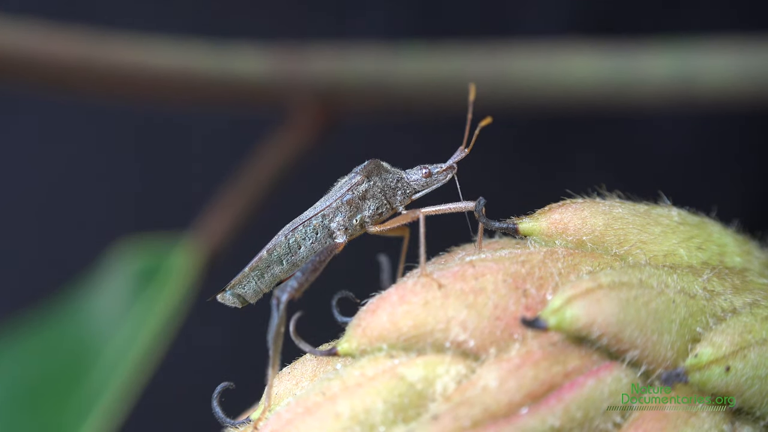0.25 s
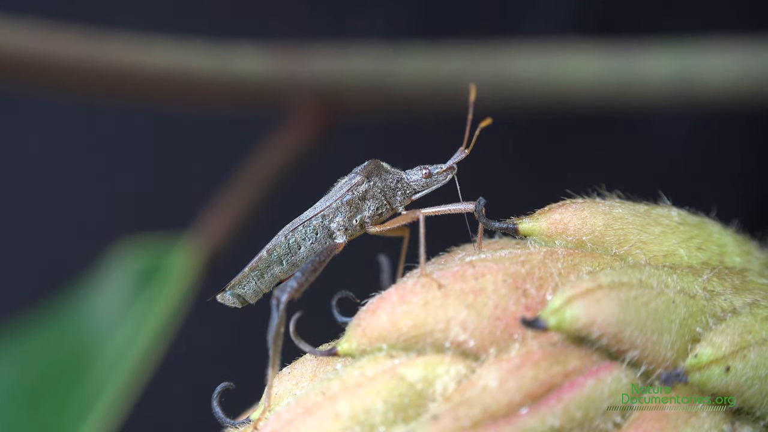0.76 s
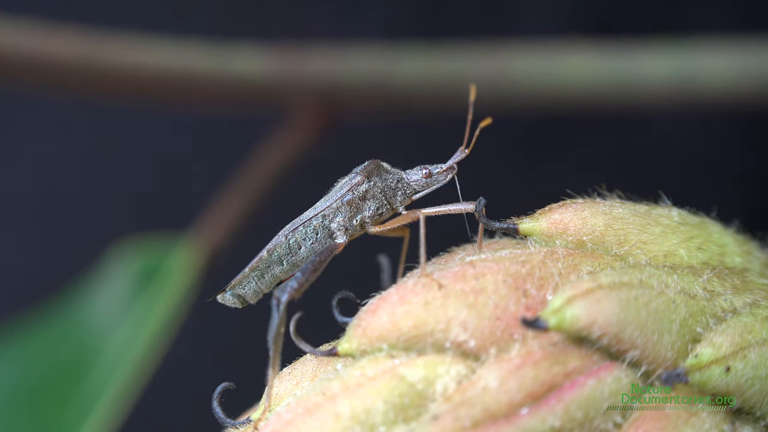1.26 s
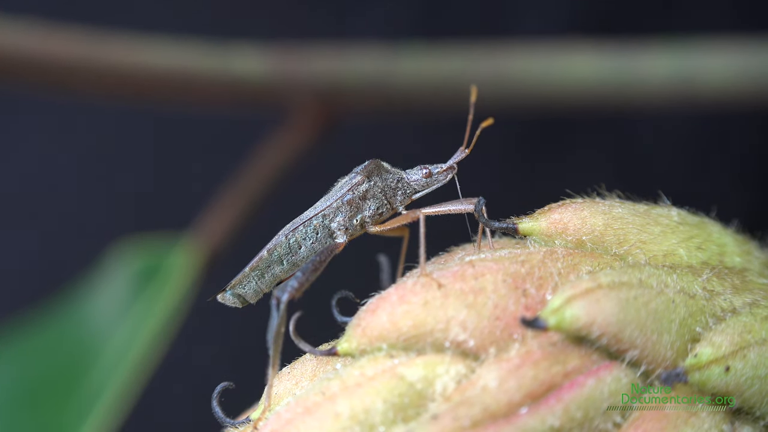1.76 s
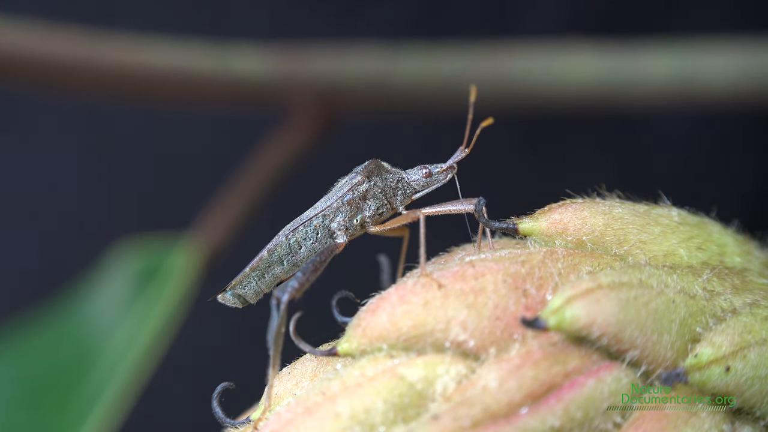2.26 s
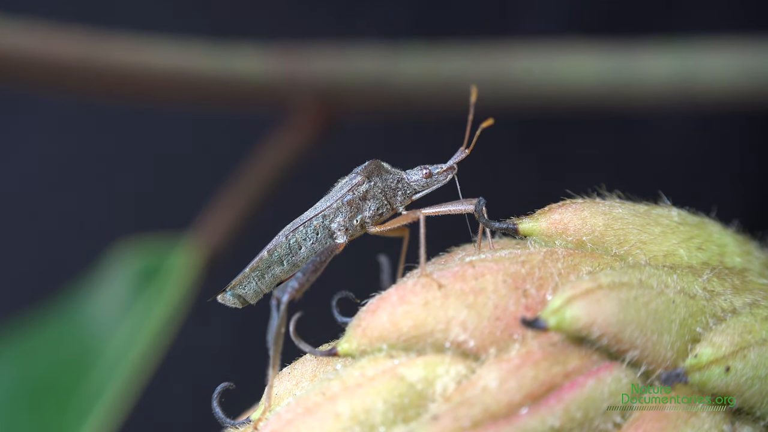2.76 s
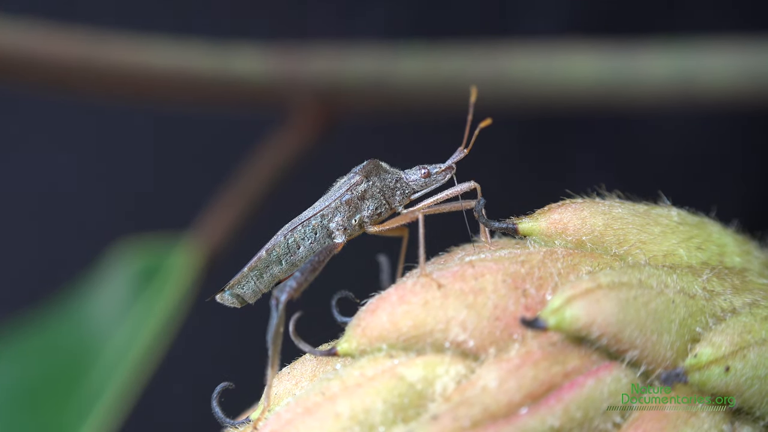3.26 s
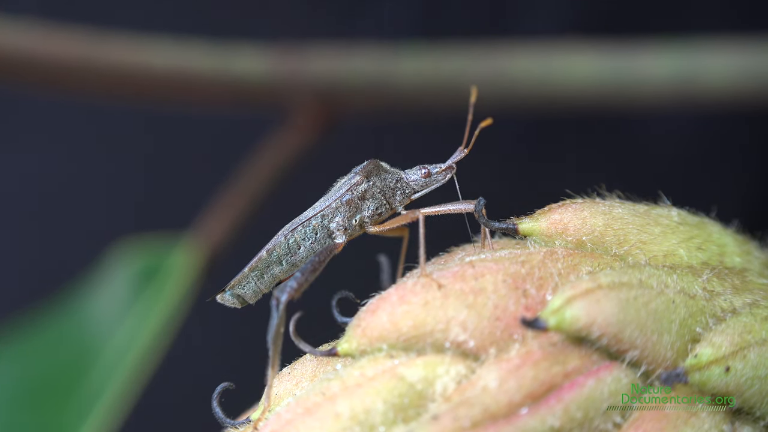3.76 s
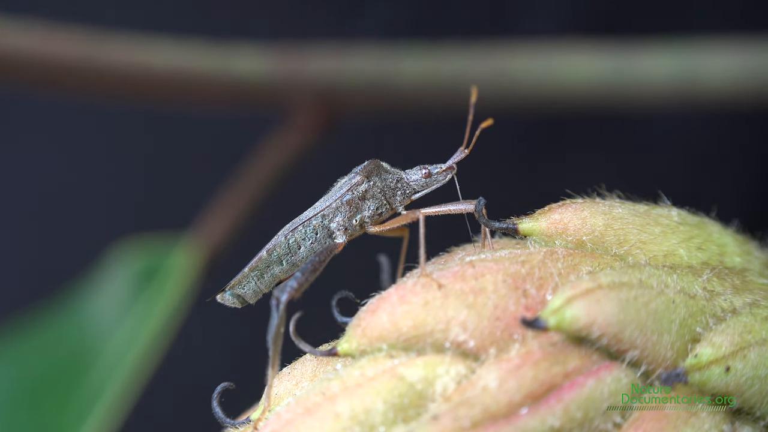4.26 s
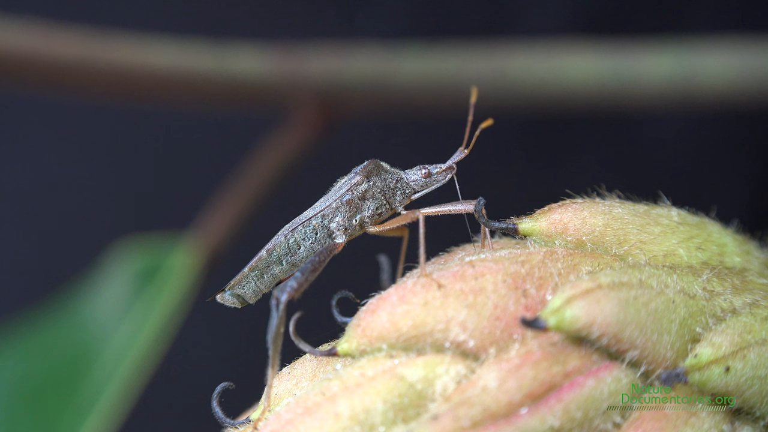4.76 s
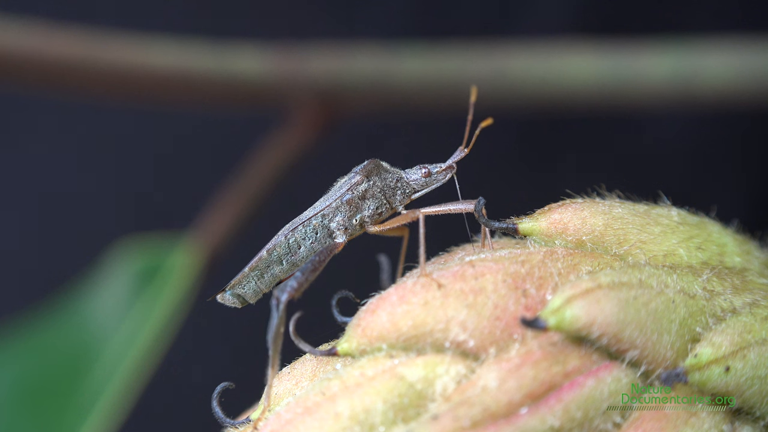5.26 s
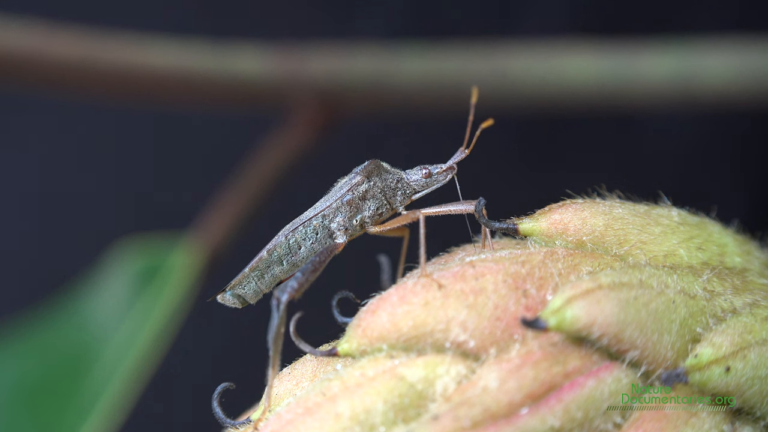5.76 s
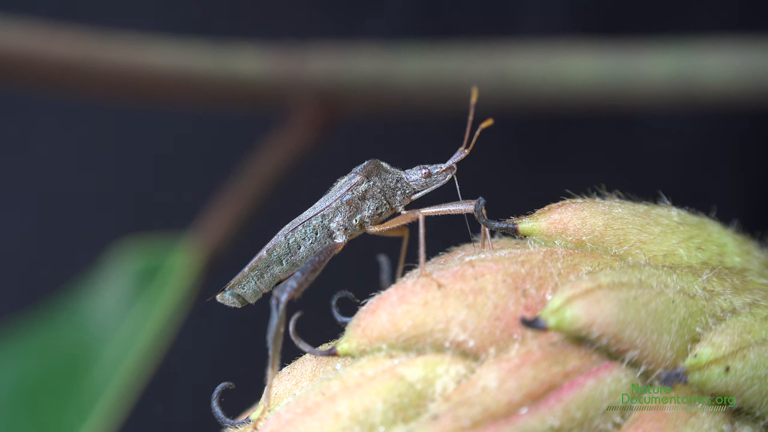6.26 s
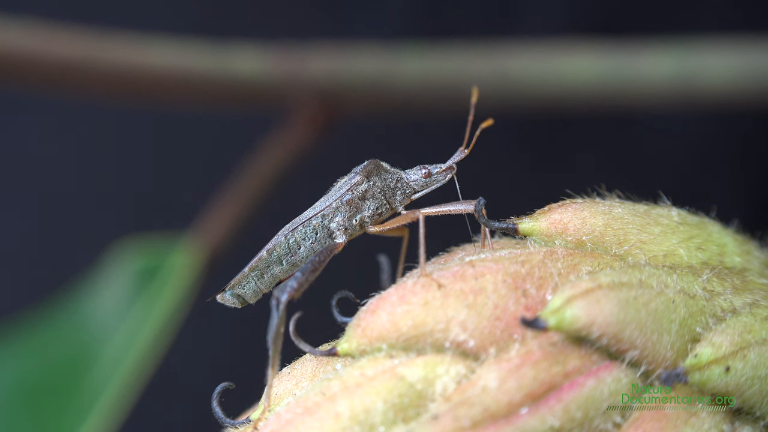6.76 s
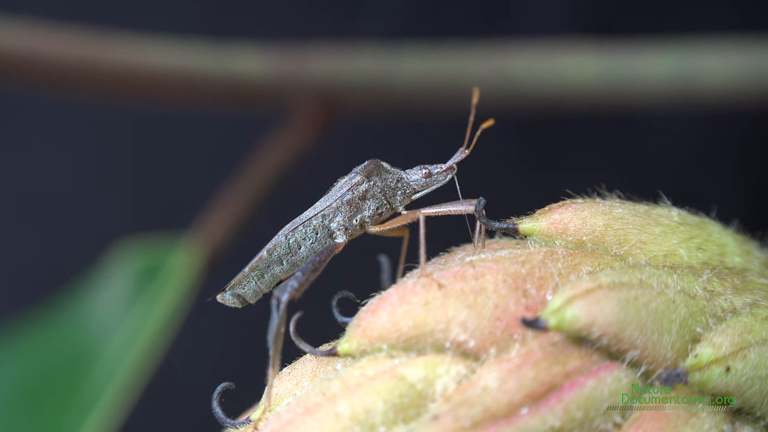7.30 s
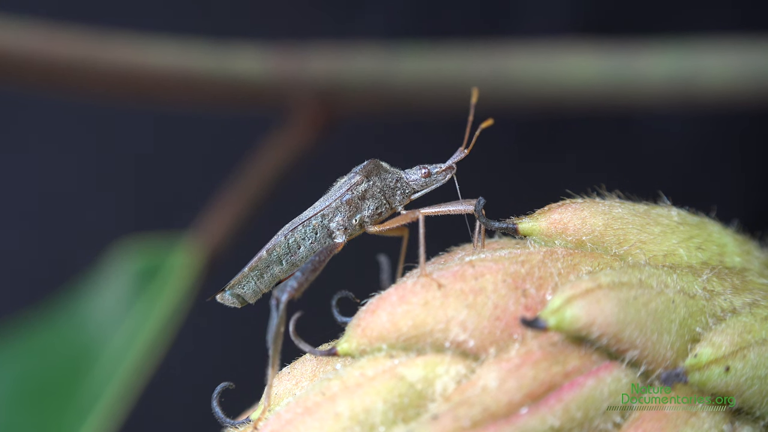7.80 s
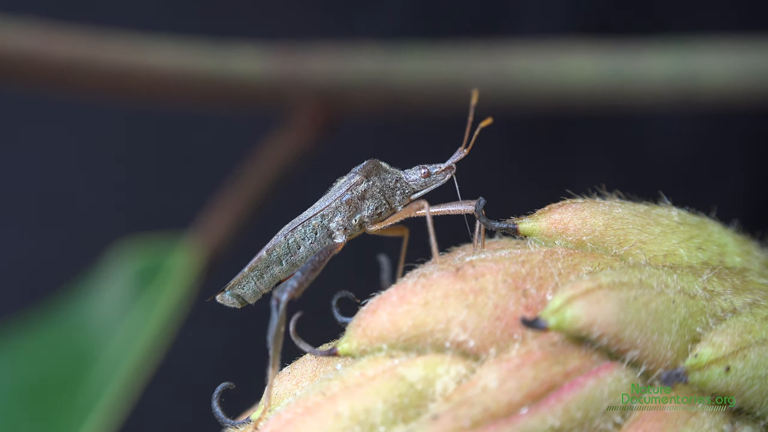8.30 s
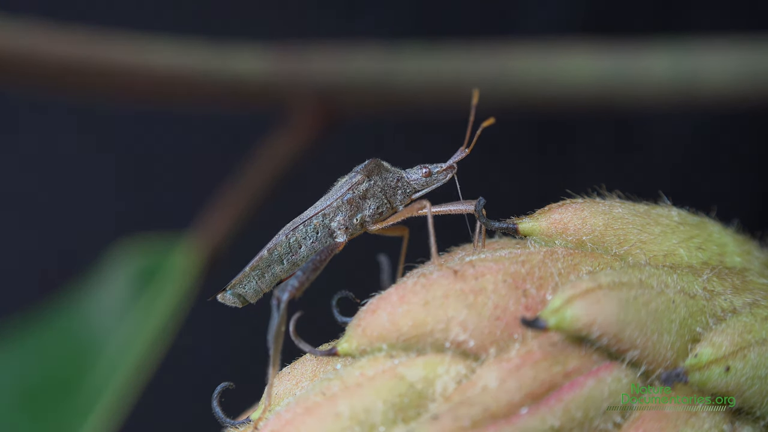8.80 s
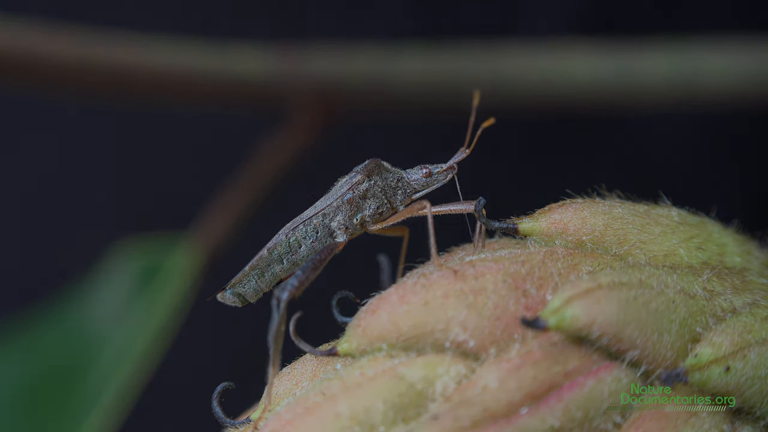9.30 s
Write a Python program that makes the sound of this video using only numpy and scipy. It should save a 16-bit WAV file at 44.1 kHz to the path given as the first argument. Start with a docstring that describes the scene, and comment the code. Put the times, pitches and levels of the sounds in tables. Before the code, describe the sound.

A quiet outdoor night filled with crickets, heard in stereo. From 0 seconds a close cricket, slightly right, sings short high trills near 6.8 kHz: rapid ringing pulses, about seventy a second, swell for roughly 0.4 seconds, slow a touch and stop dead. They repeat about every 0.7 seconds, with a longer gap around 3.5 to 4 seconds. Two distant crickets trill at their own pace, one regular and slightly higher, one looser and lower, both blurred by echoes over an unbroken shimmering chorus. A far vehicle is nearest around 0.2 seconds, then recedes into soft road roar; a very faint whine drops in pitch near 1.1 seconds. Low engine hum and boom waver below. A crisp dry tick comes at 0.8, fainter ones at 1.3, 2.7 and 7.3, with barely audible scuffs between 2 and 3.3 and near 8.2. Everything fades from about 8.5 until the end near 9.5.

```python
"""Crickets at night

One near cricket swells into short trills; two farther ones keep their own time over a distant chorus.
Each song repeats one wing stroke, a short ringing tone that falls in pitch; echoes blur the far singers.
Far traffic, as coloured noise, passes over a low engine drone built of wavering sines.
Small ticks (decaying modes) and scuffs (banded noise) sound close by. All fades in the last second."""
import sys
import numpy as np
from scipy import signal
from scipy.fft import rfft, irfft, next_fast_len
from scipy.io import wavfile

SR = 44100
rng = np.random.default_rng(int(sys.argv[2]) if len(sys.argv) > 2 else 0)


def wav_record(signal):
    """Record a signal, one row per channel, as 16-bit PCM in the file named by sys.argv[1]."""
    frames = np.transpose(np.atleast_2d(signal))
    bounded = np.clip(frames, -1, 1)
    # unit amplitude maps onto the largest positive 16-bit level
    quanta = np.round(bounded * 32767).astype(np.int16)
    wavfile.write(sys.argv[1], SR, quanta)


N = 420707

# All levels are relative: later gains and stereo offsets also apply.
# Deep night air, spectrum: [f/Hz, level/dB]
AIR_SPECTRUM = [(15, -25), (35, -6.5), (60, 1.5), (90, 1.5), (200, -13.5), (500, -80)]
# Tyre roar, spectrum: [f/Hz, level/dB]
ROAR_SPECTRUM = [(180, -10.5), (300, 0), (431, -4), (549, -2), (643, -2.5), (761, 0.5), (981, -0.5),
                 (1410, -5), (2990, -13.5), (4670, -17.5), (5400, -17), (7020, -40), (11900, -120)]
# Traffic rumble, spectrum: [f/Hz, level/dB]
RUMBLE_SPECTRUM = [(15, -2.5), (35, -5), (60, -0.5), (100, -3), (160, 1.5), (230, -0.5), (320, -16.5),
                   (450, -12), (900, -41.5)]
# Thin steady hiss, spectrum: [f/Hz, level/dB]
HISS_SPECTRUM = [(2000, -31), (5000, -36), (8200, 7.5), (9500, 8.5), (12000, 7.5)]
# Stereo sides of the noise against its middle: [f/Hz, level/dB]
SIDE_LEVELS = [(30, -14), (70, -25), (150, -18), (300, -11.5), (600, -13.5), (1100, -19.5), (1500, -34),
               (2400, -65), (4000, -65), (6000, -14)]
# Dull bumps in the rumble: [t/s, level change/dB]
RUMBLE_BUMPS = [(.35, -0.5), (1.92, 6.5), (2.03, 1.5), (2.36, 4.5), (2.82, 0.5), (3.13, 0.5), (3.80, 6),
                (4.17, 2), (5.34, 5)]
# Swells of the low boom: [t/s, level rise/dB]
BOOM_RISES = [(.25, 4), (1.05, 7.5), (1.7, 3), (2.3, 3.5), (4.75, 6.5), (5.55, 7), (6.65, 7), (8.38, 8),
              (9.05, 10.5)]
# Fundamental of the engine hum: [t/s, f/Hz]
HUM_PITCH_CURVE = [(0, 130.4), (1.1, 130.7), (2.9, 129.1), (6.5, 128.3), (8.5, 126.8)]
# Engine hum, fundamental: [t/s, level/dB]
HUM_LEVEL = [(0, -67), (.8, -72), (2.1, -66), (2.8, -58), (3.6, -59), (4.05, -68), (4.7, -61.5), (5.4, -59),
             (6.25, -69), (7.0, -56.5), (8.0, -60), (8.5, -69)]
# Engine hum, octave: [t/s, level/dB]
OCTAVE_LEVEL = [(0, -60), (1.0, -57.5), (1.3, -66), (1.7, -63), (2.4, -66), (4.2, -68.5), (4.8, -68),
                (6.9, -67.5), (8.0, -87)]
# Engine hum, third harmonic: [t/s, level/dB]
THIRD_LEVEL = [(5.2, -82), (5.8, -75), (8.5, -77)]
# Far chorus, spectrum: [f/Hz, level/dB]
CHORUS_SPECTRUM = [(5150, -36), (5350, -28), (5550, -23.5), (5750, -18), (5870, -15.5), (6100, -9),
                   (6280, -4), (6450, -1.5), (6680, 0), (6790, 1.5), (7000, -4.5), (7200, -9.5),
                   (7400, -16), (7520, -16.5), (7630, -24), (7850, -23), (8000, -34)]
# Brief dips of the chorus: [t/s, depth/dB]
CHORUS_DIPS = [(.42, 0), (1.56, 3.5), (3.88, 2), (4.53, 1.5), (5.5, 4.5), (8.76, 1)]
# Far crickets that sing unbroken: [f/Hz, level/dB, pitch waver/Hz, phase lead of the left channel/rad]
UNBROKEN_TONES = [(5740, -73, 20, 0.45), (6044, -75, 13, .4), (6380, -58.5, 28.4, 0.27),
                  (6750, -53.5, 8.6, 0.99)]
# Lower far cricket, one row a trill: [t of the last wing stroke/s, level/dB, length/s]
LOW_CRICKET_TRILLS = [(.31, -40, .22), (1.10, -46.5, 0.35), (1.75, -50, .25), (2.35, -45, 0.32),
                      (3.08, -45, 0.19), (3.72, -45.5, 0.27), (4.30, -49, 0.53), (4.92, -41, 0.36),
                      (5.42, -38.5, 0.21), (6.06, -41.5, 0.28), (6.80, -46, 0.28), (7.41, -44, .25),
                      (8.03, -52, 0.4), (8.66, -42, .25), (9.28, -52, .25)]
# Near cricket, one row a trill: [t of the last wing stroke/s, level/dB, length before the drag/s]
NEAR_TRILLS = [(0.0776, -35.5, 0.49), (0.7518, -35.5, 0.39), (1.4456, -36.5, 0.39), (2.134, -36.5, .45),
               (2.7886, -35.5, 0.34), (3.4873, -36.5, .37), (4.423, -34.5, .42), (5.1403, -34.5, 0.4),
               (5.7888, -35, .37), (6.4568, -35, .45), (7.143, -37, 0.55), (7.7594, -34, 0.36),
               (8.424, -36.5, .48), (9.0578, -36.5, 0.35), (9.6526, -37.5, 0.39)]
# Small ticks: [t/s, level/dB, pitch factor on the modes, brightness/(dB per octave)]
TICK_EVENTS = [(0.8014, -33, 0.91, -1), (.8040, -19, 0.86, 3.5), (0.8054, -42, 1, -3),
               (0.8084, -36, .88, -2), (1.2762, -35, 0.89, -4), (2.6772, -38, 0.73, -4),
               (7.3252, -40, 1.6, -1), (7.3262, -42, 1.14, -2)]
# Modes of a tick before its pitch factor: [f/Hz, level/dB, 60 dB decay time/s]
TICK_RESONANCES = [(1990, -3, 0.0035), (2560, -5.5, 0.0045), (2995, -0.5, 0.004), (3570, -9, 0.0017),
                   (5140, -4, 0.0017), (8700, -12, 0.0018)]
# Soft scuffs: [t/s, length/s, level/dB, centre f/Hz]
SCUFF_EVENTS = [(2.068, .012, -57, 3200), (2.094, 0.032, -57, 2980), (2.622, .018, -61, 2750),
                (2.67, .034, -59, 2650), (3.262, 0.058, -64, 2900), (8.217, 0.36, -70, 2970)]
# Level of the whole scene, falling at the end: [t/s, level/dB]
CLOSING_FADE = [(0, 1), (8.4, 1), (8.75, -2), (9.0, -3.5), (9.2, -7), (9.54, -9.2)]

# the vehicle is nearest at PASS_S, then recedes into the sound of the road
PASS_S, DISTANCE_M, SPEED_M_PER_S = 0.22, 22, 22.5
VEHICLE_DB, ROAD_DB, ROAD_EBB_DB_PER_S = -49.5, -54.5, 0.6032
RUMBLE_DB, RUMBLE_WAVER_DB, BUMP_S = -4.5, 0.9, 0.079  # rumble level relative to the tyre roar
BOOM_DB, BOOM_EBB_DB_PER_S, BOOM_SWELL_S = -57, 0.66, 0.16
HUM_LEFT_DB = 1
WHINE_HZ, WHINE_PASS_S, WHINE_DOPPLER, WHINE_SWEEP_S = 554, 1.12, 0.12, .2
WHINE_DB, WHINE_EBB_DB_PER_S = -58, 12
CHORUS_DB, CHORUS_WAVER_DB, DIP_S = -48.5, 1.5, 0.074
# the higher far cricket trills like clockwork
HIGH_FIRST_S, HIGH_EVERY_S = .77, .75
HIGH_DB, HIGH_TRILL_S, FAR_STROKES_PER_S = -44, .38, 68
STROKES_PER_S, SWELL_DB = 71, 39  # near cricket
DRAG_S, DRAG_STROKES = .0047, 2.3  # total delay, and how many strokes it builds over
SCUFF_SPREAD = 1.17  # band edges as a factor on the centre frequency
EDGE_HZ = 12030
# the moments around one wing stroke (s)
STROKE_T = np.arange(-round(.007 * SR), round(.007 * SR)) / SR


def amp(db):
    """Logarithmic level: 20 dB is a tenfold amplitude."""
    return 10 ** (np.asarray(db) / 20)


def unit(x):
    """Normalisation: division by the root mean square gives rms 1."""
    return x / np.sqrt(np.mean(x ** 2) + 1e-20)


def curve(rows, axis=1):
    """Linear interpolation: one column of a time table at every sample."""
    rows = np.array(rows)
    return np.interp(np.arange(N) / SR, rows[:, 0], rows[:, axis])


def swells(rows, width_s):
    """Gaussian envelope: a smooth hump of dB around each (s, dB) row."""
    t = np.arange(0, N, 64) / SR
    humps = sum(db * np.exp(-((t - s) / width_s) ** 2 / 2) for s, db in rows)
    return np.interp(np.arange(N) / SR, t, humps)


def drift(per_s):
    """Random modulation: summed slow sines of rms 1, changing about per_s times a second."""
    t = np.arange(0, N, 64) / SR
    rates = per_s * np.linspace(.1, 1, 20) * rng.uniform(.8, 1.2, 20)
    slow = sum(np.sin(2 * np.pi * (f * t + rng.random())) for f in rates)
    return unit(np.interp(np.arange(N) / SR, t, slow))


def add(mix, s, sound):
    """Superposition: a sound is summed into the mix at time s."""
    at = round(s * SR) + np.arange(len(sound))
    inside = (at >= 0) & (at < N)
    mix[at[inside]] += sound[inside]


def colour(x, points):
    """Spectral shaping: (Hz, dB) points weight the spectrum of x, then rms is set to 1."""
    hz, db = np.transpose(points)
    size = next_fast_len(N)
    f = np.fft.rfftfreq(size, 1 / SR)
    gain = amp(np.interp(np.log(f + 1), np.log(hz), db))
    return unit(irfft(rfft(x, size) * gain, size)[..., :N])


def spread(pair, side_db):
    """Middle and side stereo: two unrelated signals make the centre and the width of the field."""
    return pair[0] + amp(side_db) * np.array([pair[1], -pair[1]])


def noise(points):
    """Diffuse field: coloured noise from all around, whose width changes with frequency."""
    hz, side_db = np.transpose(SIDE_LEVELS)
    size = next_fast_len(N)
    middle, side = colour(rng.standard_normal((2, N)), points)
    side_gain = amp(np.interp(np.fft.rfftfreq(size, 1 / SR), hz, side_db))
    side = irfft(rfft(side, size) * side_gain, size)[:N]
    return spread([middle, side], 0)


def scatter(x, t60):
    """Multiple scattering: two unrelated, decaying tails of echoes from leaves and walls."""
    t = np.arange(SR // 2) / SR
    tails = rng.standard_normal((2, len(t))) * amp(-60 * t / t60) * (t > .003)
    tails = tails[:, t < t60]
    return signal.oaconvolve(x[None], tails / np.linalg.norm(tails[0]), axes=1)[:, :N]


def wing(hz, glide, stroke_s, delay_s=0):
    """Driven resonance: one wing closure rings the wing for a few ms, falling in pitch as it slows."""
    u = (STROKE_T - delay_s) / stroke_s
    turns = np.cumsum(hz * (1 - glide * np.tanh(u / 2))) / SR
    return np.exp(-u ** 2 / 2 + 2j * np.pi * turns)


def sing(trills, rate, stroke, swell_db, drag_s=0):
    """Stridulation: one stroke repeats; a trill swells, may drag over its last strokes, then stops dead."""
    out, shape, turn = np.zeros(N), abs(stroke), np.angle(stroke)
    for end, db, length_s in trills:
        for k, (size, detune, late, phase) in enumerate(rng.standard_normal((40, 4))):
            early = k / rate / length_s  # 1 at the first stroke, 0 at the last
            if early < 1:
                sound = shape * np.cos(turn + 2 * np.pi * (19 * detune * STROKE_T + phase))
                before_end = k / rate + drag_s * (1 - np.exp(-k / DRAG_STROKES))
                start = end + STROKE_T[0] - before_end + .00015 * late
                level_db = db + 1.5 * size - swell_db * early ** 3.84
                add(out, start, amp(level_db) * sound)
    return out


def drone():
    """Harmonic series: a wavering engine hum and two overtones, with an uneven boom and deep night air."""
    t = np.arange(N) / SR
    boom_db = BOOM_DB - BOOM_EBB_DB_PER_S * t + swells(BOOM_RISES, BOOM_SWELL_S)
    boom_tone = np.sin(2 * np.pi * np.cumsum(77.5 + 3 * drift(9)) / SR)
    boom = amp(boom_db) * unit((1 + 0.36 * drift(14)) * boom_tone)
    air = amp(-58) * noise(AIR_SPECTRUM)
    turns = np.cumsum(curve(HUM_PITCH_CURVE) + .9 * drift(9)) / SR
    levels_db = curve(HUM_LEVEL), curve(OCTAVE_LEVEL), curve(THIRD_LEVEL) + 2 * drift(4.4)
    hum = sum(amp(db) * unit(np.sin(2 * np.pi * k * turns)) for k, db in enumerate(levels_db, 1))
    return (boom + air) * amp([[-.7], [.7]]) + hum * amp([[HUM_LEFT_DB], [-HUM_LEFT_DB]])


def traffic():
    """Inverse distance law: tyre roar and rumble fall as the vehicle recedes, over a thin steady hiss."""
    t = np.arange(N) / SR
    nearness = DISTANCE_M / np.hypot(DISTANCE_M, SPEED_M_PER_S * (t - PASS_S))
    # vehicle and road are unrelated, so their powers add
    level = np.hypot(amp(VEHICLE_DB) * nearness, amp(ROAD_DB - ROAD_EBB_DB_PER_S * t))
    roar = level * amp(0.68 * drift(12)) * noise(ROAR_SPECTRUM)
    rumble_db = RUMBLE_DB + RUMBLE_WAVER_DB * drift(5) + swells(RUMBLE_BUMPS, BUMP_S)
    rumble = level * amp(rumble_db) * noise(RUMBLE_SPECTRUM)
    hiss_pair = colour(rng.standard_normal((2, N)), HISS_SPECTRUM)
    hiss = amp(-66.5) * spread(hiss_pair, side_db=-4.5)
    return roar + rumble * amp([[.6], [-.6]]) + hiss * amp([[-.8], [.8]])


def whine():
    """Doppler effect: the thin whine of a fast vehicle far off drops in pitch as it goes by."""
    t = np.arange(N) / SR - WHINE_PASS_S
    hz = WHINE_HZ * (1 - WHINE_DOPPLER * t / np.hypot(t, WHINE_SWEEP_S)) + 6 * drift(30)
    flutter = np.maximum(.9 + .45 * drift(12), 0)
    tone = flutter * np.sin(2 * np.pi * np.cumsum(hz) / SR)
    return amp(WHINE_DB - WHINE_EBB_DB_PER_S * abs(t)) * tone


def chorus():
    """Incoherent sum: far crickets, each on its own pitch and rhythm, blur into one shimmering band."""
    pair = np.zeros((2, N))
    for hz in np.linspace(5600, 7550, 13):
        ends = np.arange(-1, N / SR + 1, rng.uniform(.43, .46)) + rng.random()
        rate = rng.uniform(55, 80)
        trills = [(s, 0, .45) for s in ends]
        song = sing(trills, rate, wing(hz, glide=.03, stroke_s=.0005), swell_db=2)
        pair += scatter(song, t60=0.056)
    level_db = CHORUS_DB + CHORUS_WAVER_DB * drift(3) - swells(CHORUS_DIPS, DIP_S)
    return amp(level_db) * spread(colour(pair, CHORUS_SPECTRUM), side_db=-14.5) * amp([[-.55], [.55]])


def far_tones():
    """Amplitude and frequency modulation: unbroken trills, blurred by distance into fluttering whistles."""
    pair = np.zeros((2, N))
    for hz, db, waver_hz, lead in UNBROKEN_TONES:
        flutter = np.maximum(1 + .45 * drift(70) + .35 * drift(5), 0)
        turns = np.cumsum(hz + waver_hz * drift(40)) / SR
        tone = np.sqrt(2) * np.sin(2 * np.pi * turns + lead * np.array([[.5], [-.5]]))
        pair += amp(db) * unit(flutter) * tone
    return pair * amp([[-.7], [.7]])


def low_cricket():
    """Reverberation: a lower cricket, also far and blurred by echoes, with looser timing."""
    stroke = wing(hz=6600, glide=0.0344, stroke_s=0.00087)
    song = sing(LOW_CRICKET_TRILLS, FAR_STROKES_PER_S, stroke, swell_db=18)
    return amp(3.0) * spread(scatter(song, t60=0.16), side_db=-6)


def high_cricket():
    """Reverberation: a far cricket heard through echoes, which round off the ends of its regular trills."""
    ends = np.arange(HIGH_FIRST_S, N / SR + HIGH_EVERY_S, HIGH_EVERY_S)
    trills = [(s, HIGH_DB, HIGH_TRILL_S) for s in ends]
    stroke = wing(hz=7030, glide=0.024, stroke_s=0.00058)
    song = sing(trills, FAR_STROKES_PER_S, stroke, swell_db=20)
    return amp(3.0) * spread(scatter(song, t60=0.23), side_db=-5.0)


def scuffs():
    """Friction noise: soft rubs as brief, grainy puffs around one pitch."""
    out = np.zeros(N)
    for s, length_s, level_db, hz in SCUFF_EVENTS:
        t = np.arange(SR // 2) / SR
        grains = rng.standard_normal(len(t)) * amp(3 * rng.standard_normal(len(t)))
        edges = [hz / SCUFF_SPREAD, hz * SCUFF_SPREAD]
        band = signal.butter(2, edges, "band", fs=SR, output="sos")
        puff = np.sin(np.pi * np.minimum(t / length_s, 1))
        add(out, s, amp(level_db) * puff * unit(signal.sosfilt(band, grains)))
    return out


def ticks():
    """Modal decay: small dry snaps ring on a few modes, each with a short, brighter tail of echoes."""
    t, out = np.arange(SR // 30) / SR, np.zeros(N)
    contact = 1 - np.exp(-(t / 0.00027) ** 2)  # the blow takes a moment to build
    for s, level_db, pitch, tilt_db in TICK_EVENTS:
        ring = np.zeros(len(t))
        for hz, db, t60 in TICK_RESONANCES:
            decay = amp(db + tilt_db * np.log2(hz / 3000) - 60 * t / t60)
            ring += decay * np.sin(2 * np.pi * hz * pitch * t)
        add(out, s, amp(level_db) * contact * ring)
    out = signal.sosfilt(signal.butter(4, 1400, "high", fs=SR, output="sos"), out)
    brighter = .14 * out + np.diff(out, prepend=0)
    tail = scatter(brighter, t60=.1)[0]
    return amp(2.5) * (out + tail)


def near_cricket():
    """Pulsed resonance: each close stroke holds a main and a fainter high note; a weaker low one trails."""
    high = amp(-13) * wing(hz=7080, glide=0.019, stroke_s=0.001, delay_s=.0002)
    main = wing(hz=6770, glide=0.019, stroke_s=0.0019)
    trail = amp(-8.0) * wing(hz=6530, glide=0.0267, stroke_s=0.00094, delay_s=0.004)
    song = amp(0.54) * sing(NEAR_TRILLS, STROKES_PER_S, high + main + trail, SWELL_DB, DRAG_S)
    analytic = signal.hilbert(song, next_fast_len(N))[:N]
    direct = (analytic * np.exp(1j * np.array([[.25], [-.25]]))).real  # the left channel leads in phase
    echoes = amp(-10.5) * spread(scatter(song, t60=0.05), side_db=-9)
    return (direct + echoes) * amp([[-1], [1]])  # louder on the right


def scene():
    """Linear superposition: all sources sum."""
    background = drone() + traffic() + whine() + chorus() + far_tones()
    return background + low_cricket() + high_cricket() + scuffs() + ticks() + near_cricket()


def record(dry):
    """Band limitation: the microphone's bass cut, the closing fade, then a steep treble limit."""
    dry = signal.sosfilt(signal.butter(4, 25, "high", fs=SR, output="sos"), dry)
    faded = dry * amp(curve(CLOSING_FADE))
    treble_limit = signal.firwin(511, EDGE_HZ, window=("kaiser", 9), fs=SR)
    return signal.oaconvolve(faded, treble_limit[None], "same")


dry = scene()
out = record(dry)
wav_record(out)
```